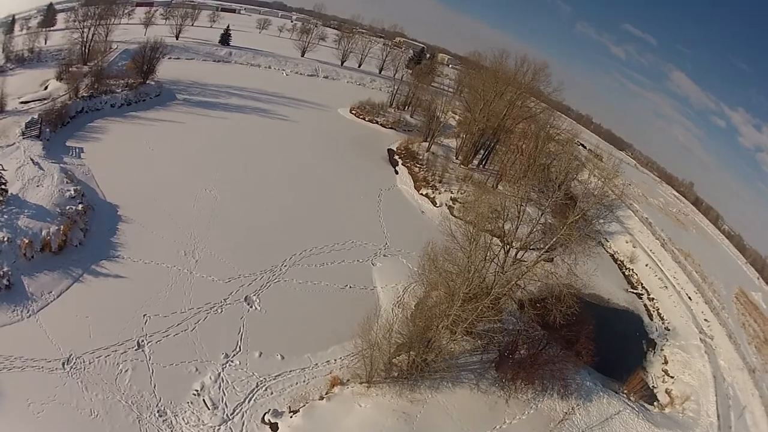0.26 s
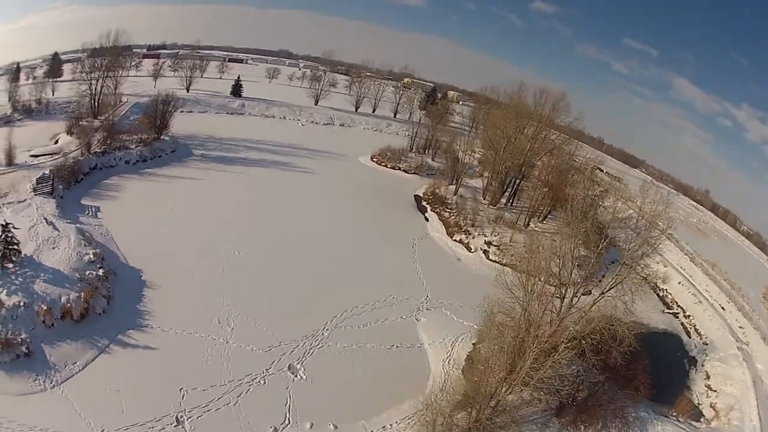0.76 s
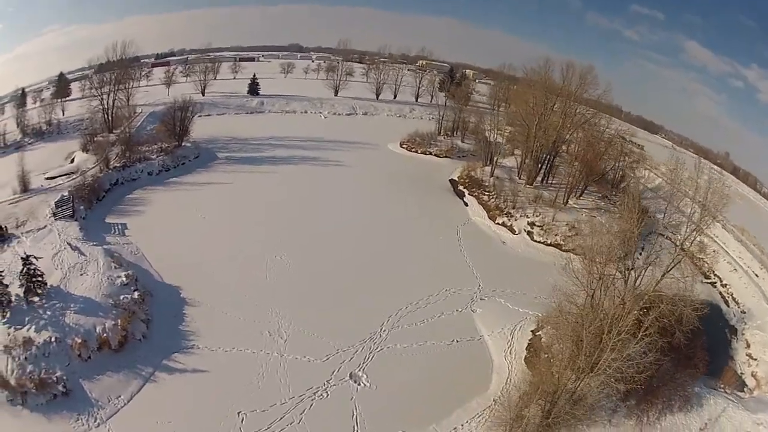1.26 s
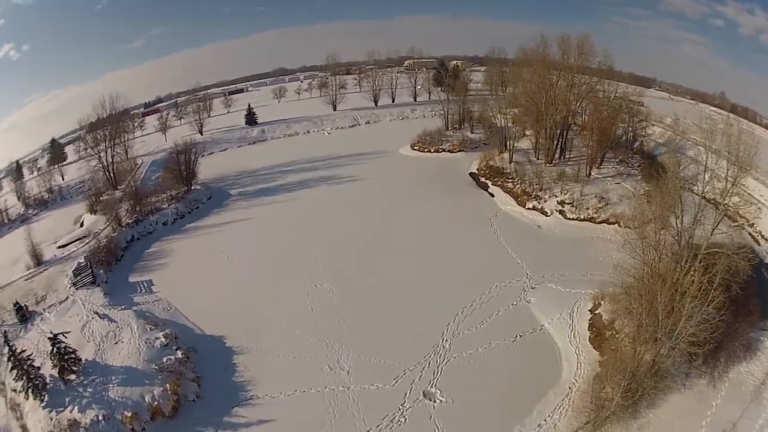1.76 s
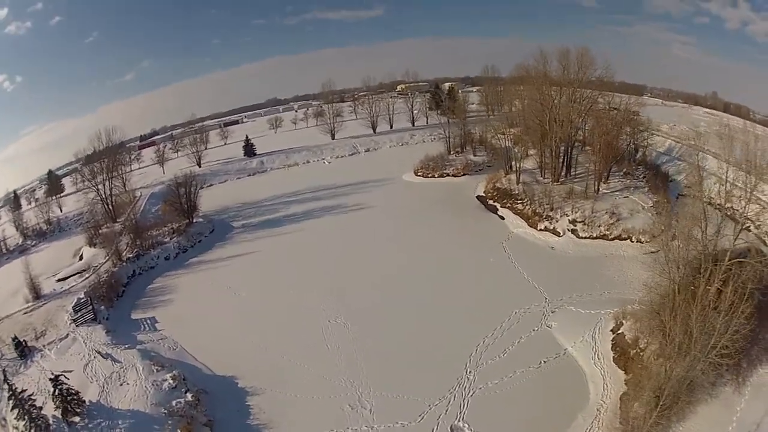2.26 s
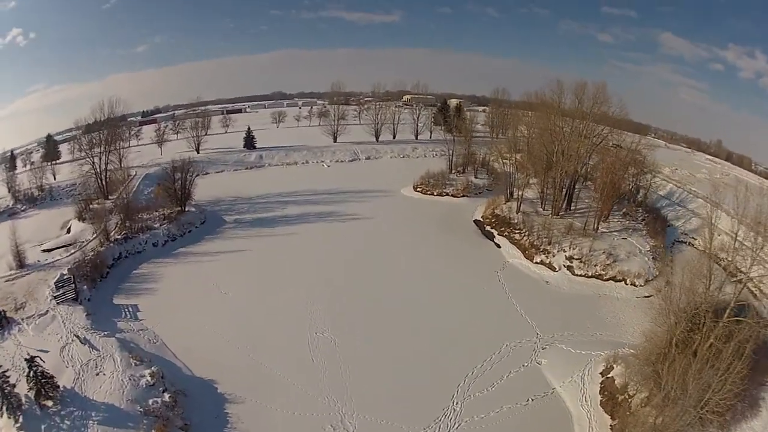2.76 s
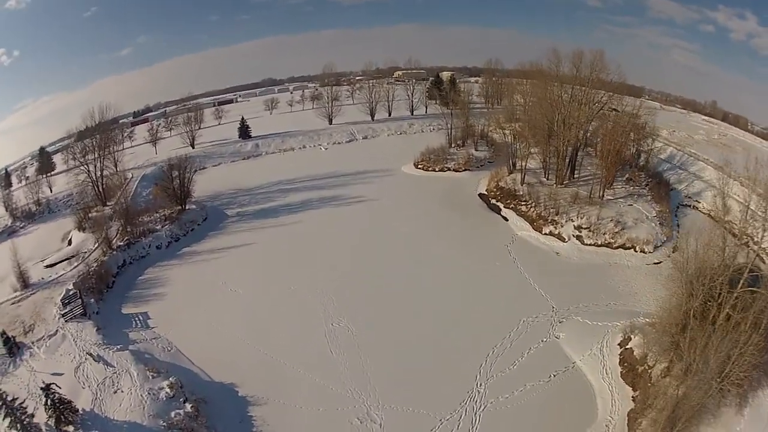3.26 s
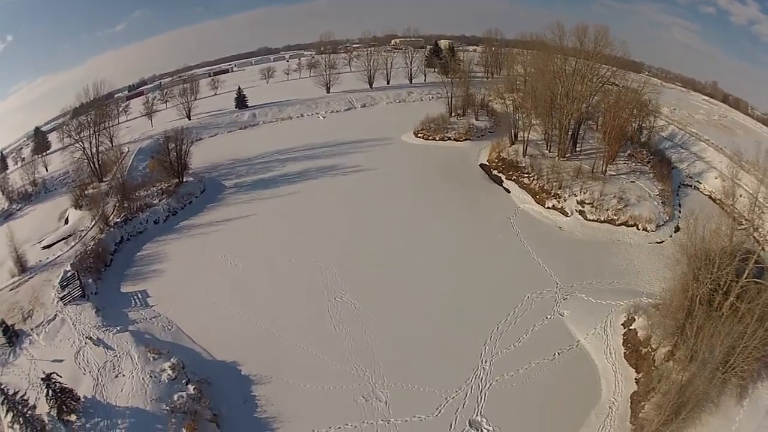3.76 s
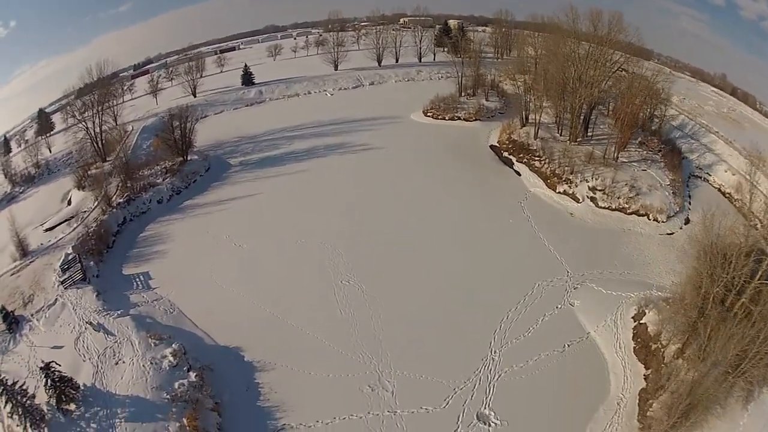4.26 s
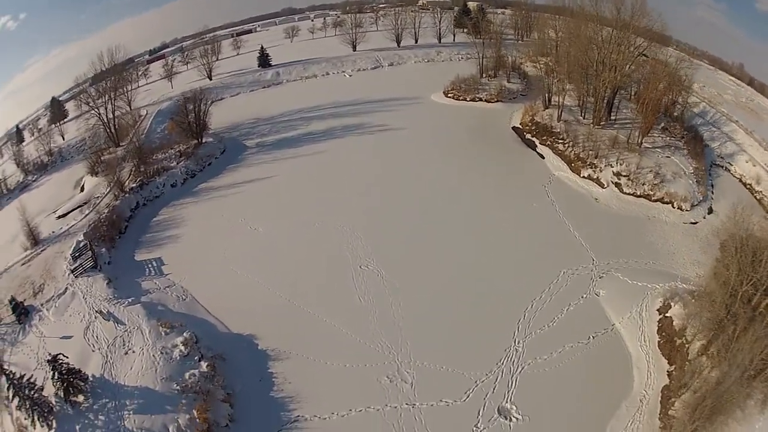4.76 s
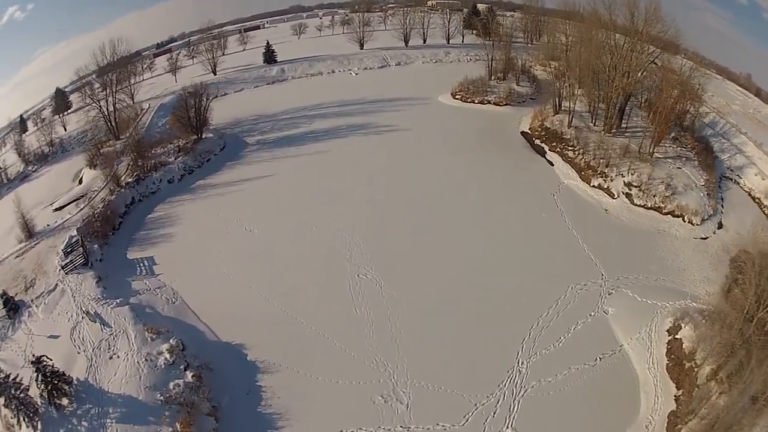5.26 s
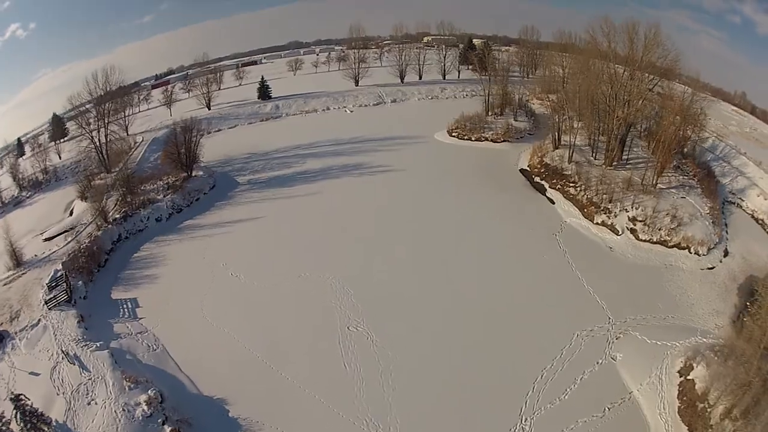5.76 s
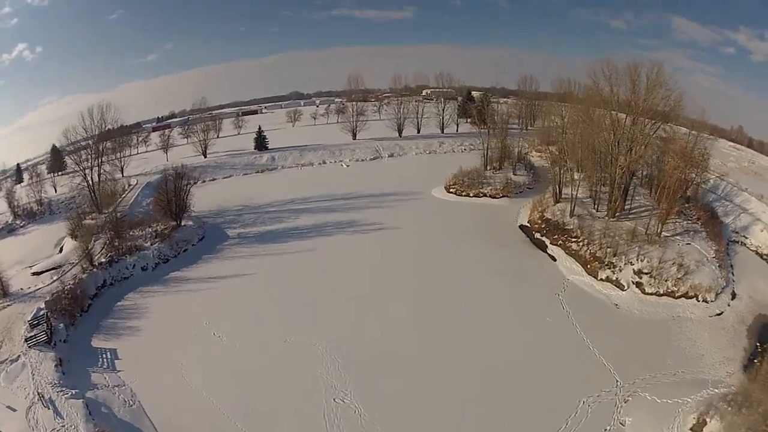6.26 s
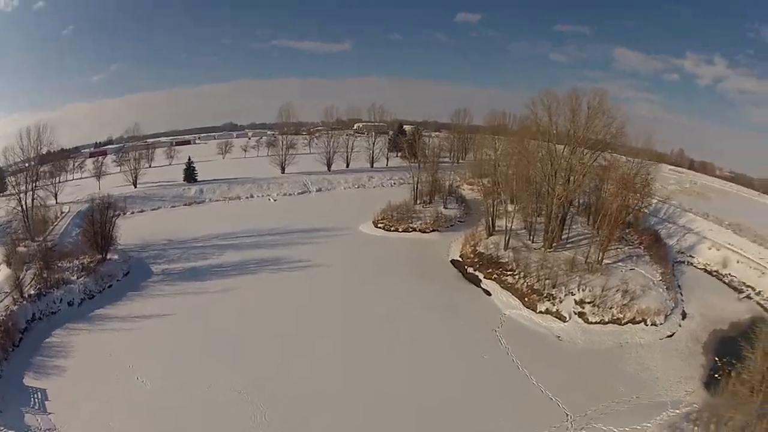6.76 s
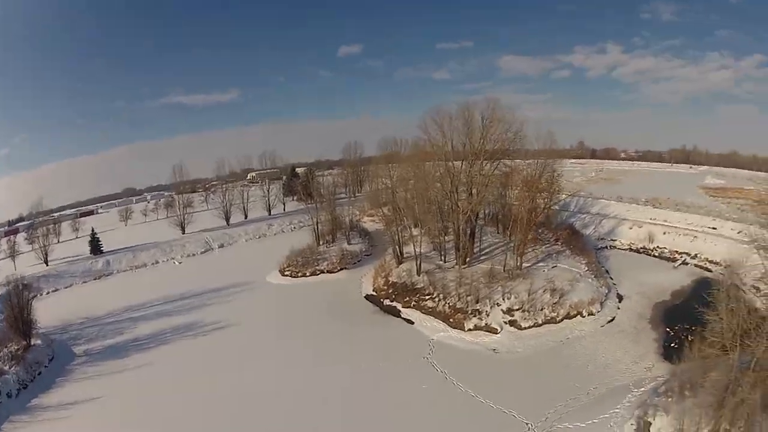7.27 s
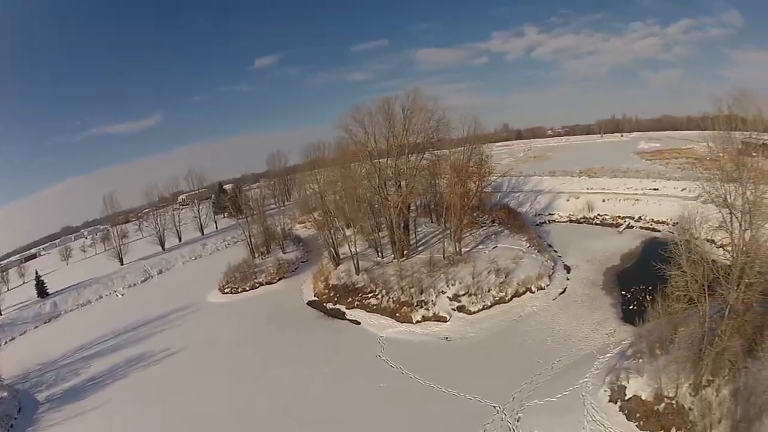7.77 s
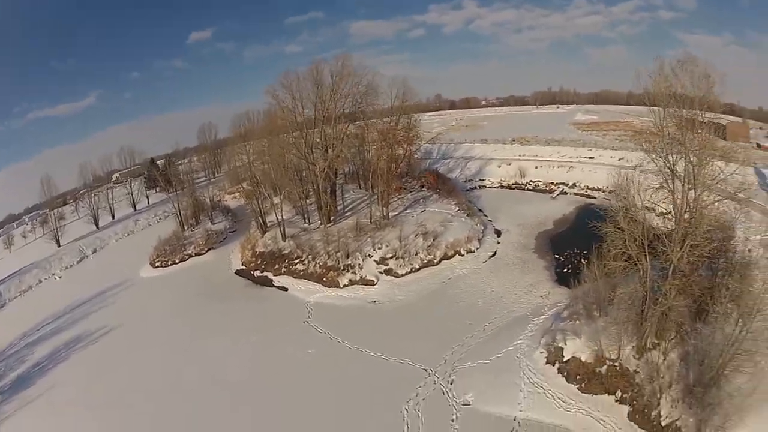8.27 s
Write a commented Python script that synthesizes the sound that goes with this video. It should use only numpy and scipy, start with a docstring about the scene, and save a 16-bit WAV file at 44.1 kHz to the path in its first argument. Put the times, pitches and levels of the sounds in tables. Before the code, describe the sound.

A small quadcopter's propellers drone at a low, slightly wavering pitch, beating against each other, with airy blade hiss. Wind roars and thumps on the onboard microphone in the first four seconds, then a steadier hum follows over open snowy ground until heavy, overloaded gusts strike near eight seconds. The sound is mono, close, coarse and gritty in the treble.

```python
"""A small quadcopter flies over a frozen pond, itself silent, heard from the camera that it carries.
From the start four two-bladed rotors hum at different speeds and beat, air hisses through the blades,
wind rumbles on the microphone, and coarse 8 kHz sampling mirrors it all into a gritty treble.
From 0.7 to 4.1 s gusts roar and single eddies thump; overloads make the limiter duck and recover.
Calmer flight follows until a last cluster from 7.7 s, with the hardest blows near 7.9 s."""
import sys
import numpy as np
from scipy import signal
from scipy.fft import rfft, irfft, next_fast_len
from scipy.io import wavfile
from scipy.ndimage import map_coordinates

SR = 44100
rng = np.random.default_rng(int(sys.argv[2]) if len(sys.argv) > 2 else 0)


def inscribe(sig):
    """Save sig as 16-bit PCM at rate SR to the path in sys.argv[1].

    A 1-D sig is mono; a 2-D sig holds one channel per row.
    Samples are clipped to [-1, 1] before scaling.
    """
    pcm = np.round(np.clip(np.atleast_2d(sig).T, -1, 1) * 32767)
    wavfile.write(sys.argv[1], SR, pcm.astype(np.int16))


N = 375732

# Air through the blades: (time [s], relative hiss level [dB])
AIRFLOW = [(0.0, -36), (0.25, -40.5), (0.7, -36), (1.2, -36), (1.5, -35.5), (1.9, -36.5), (2.42, -31),
           (2.65, -37), (3.7, -38), (4.3, -33.5), (6.3, -30.5), (6.55, -28.5), (6.9, -31), (7.7, -34),
           (8.52, -35)]


def amp(db):
    """Level to amplitude: 20 dB is a factor of ten."""
    return 10 ** (np.asarray(db) / 20)


def unit(x):
    """Normalise the power: scale to rms 1."""
    return x / np.sqrt(np.mean(x ** 2) + 1e-20)


def along(points, hz):
    """Interpolate (frequency or order, value) points on a logarithmic axis."""
    f, v = np.transpose(points)
    return np.interp(np.log(hz + 1e-9), np.log(f), v)


def curves(rows):
    """Interpolate linearly in time: one value per sample for each column after the time."""
    s, *cols = np.transpose(rows)
    return [np.interp(np.arange(N) / SR, s, c) for c in cols]


def wobble(rate):
    """Slow random modulation: a spline through normal deviates, rate knots a second."""
    knots = rng.standard_normal(4096)
    return map_coordinates(knots, [np.arange(N) * rate / SR], mode="wrap")


def filtered(x, response):
    """Linear filtering: multiply the spectrum by a real gain, a function of frequency in Hz."""
    size = next_fast_len(N + 8192)  # zero padding limits wrap-around
    spectrum = rfft(x, size)
    return irfft(spectrum * response(np.fft.rfftfreq(size, 1 / SR)), size)[:N]


def noise(spectrum):
    """Coloured noise: white noise shaped by a spectrum, at rms 1."""
    return unit(filtered(rng.standard_normal(N), lambda hz: amp(along(spectrum, hz))))


def shaft_angle(speed, flutter):
    """Phase is the integral of speed, here a shaft's, which trembles in turbulent air."""
    return 2 * np.pi * np.cumsum(speed * (1 + flutter * wobble(60))) / SR


def rotor(angle, hum_db, imbalance_db, overtone_db, waver_db, count=40, size=4096):
    """Harmonic series of a shaft: order 1 is imbalance, order 2 the passing of two blades, 3 up a buzz."""
    # Overtones of one rotor: (multiple of the shaft speed [1], level relative to overtone_db [dB])
    order_levels = [(3, -23), (4, -15.5), (5, -26), (6, -23.5), (7, -30.5), (8, -35), (10, -44.5),
                    (14, -33), (20, -46), (26, -34.5), (40, -56)]
    turn = np.arange(size) * 2 * np.pi / size
    orders = np.arange(3, count)[:, None]
    phases = rng.uniform(0, 2 * np.pi, orders.shape)
    partials = amp(along(order_levels, orders)) * np.sin(orders * turn + phases)
    one_turn = np.sum(partials, axis=0)
    buzz = amp(overtone_db + waver_db * wobble(14)) * np.interp(angle % (2 * np.pi), turn, one_turn)
    imbalance = amp(imbalance_db + waver_db * wobble(5.0)) * np.sin(angle)
    blades = amp(hum_db + 1.65 * wobble(18)) * np.sin(2 * angle)
    return np.sqrt(2) * (blades + imbalance + buzz)  # root 2 makes the levels rms


def rotors(angles):
    """Interference: the near blade tones beat at twice the shafts' speed difference; the far ones blur it."""
    # Blade tones of the two rotors nearest the microphone:
    # (time [s], first rotor's level [dB], second rotor's level [dB])
    hum_levels = [(0, -16.5, -25), (1.4, -17, -28.5), (2.9, -17.5, -26.5), (3.6, -22, -22.5),
                  (4.4, -19.5, -25), (5.3, -17, -18.5), (6.3, -15.5, -20), (7.2, -17, -25.5),
                  (8.52, -21, -32)]
    far_hum_db, imbalance_db = -28.5, -32
    second_db, far_db = -3, -9  # imbalance and overtones, relative to the first rotor's
    first_hum_db, second_hum_db = curves(hum_levels)
    hiss_db, = curves(AIRFLOW)
    load_db = hiss_db + 16.5  # overtones follow the load on the blades
    first = rotor(angles[0], first_hum_db, imbalance_db, load_db, waver_db=2.5)
    second = rotor(angles[1], second_hum_db, imbalance_db + second_db, load_db + second_db, waver_db=3.0)
    far = sum(rotor(angle, far_hum_db, imbalance_db + far_db, load_db + far_db, waver_db=2.5)
              for angle in angles[2:])
    return first + second + far


def blade_hiss(angles, chop):
    """Amplitude modulation: torn air pulses with each turn; faster flow fills in the frame's resonances."""
    # Hiss in slow and in fast flow: (frequency [Hz], relative spectral level [dB per Hz])
    slow_air = [(60, -35), (300, -7), (700, -44), (1400, -12), (1700, -3), (2100, -11), (2550, -3.5),
                (2900, -24), (3400, -18.5), (4000, -11)]
    fast_air = [(60, -56), (300, -1), (600, 3), (1200, -1), (1800, 2), (2300, -1), (2900, -1), (3400, -0.5),
                (4000, -3.5)]
    hiss_db, = curves(AIRFLOW)
    fast = 1 / (1 + amp(-3 * (hiss_db + 39.5)))  # share of fast flow, half at -39.5 dB
    air = np.sqrt(1 - fast) * noise(slow_air) + np.sqrt(fast) * amp(-2.5) * noise(fast_air)
    pulsing = sum(np.cos(angle) + np.cos(2 * angle) for angle in angles[:2])
    level_db = hiss_db + 9.5 + 0.84 * wobble(14)
    return amp(level_db) * unit(air * np.exp(chop * pulsing))


def wind():
    """Turbulent pressure: eddies rumble and flutter on the microphone; direct gusts roar in its port."""
    # Wind on the microphone: (time [s], level of the large eddies [dB])
    rumble_levels = [(0, -37), (0.4, -31), (0.8, -20), (1.4, -30), (2.25, -18), (2.48, -15), (2.58, -27),
                     (3.25, -45), (3.44, -27), (3.7, -32), (6.5, -29), (7.5, -24), (7.84, -13),
                     (8.25, -16.5), (8.52, -27)]
    # Gusts straight across the port: (start [s], length [s], roar level [dB], flutter level [dB])
    gusts = [(0.673, 0.017, -15, -15), (0.728, 0.19, -12.5, -13), (0.885, 0.33, -17.5, -13.5),
             (1.293, 0.057, -18.5, -11), (1.458, 0.026, -20.5, -15.5), (1.64, 0.04, -25, -13.5),
             (1.685, 0.045, -11, -10), (1.736, 0.13, -18.5, -17.5), (1.872, 0.45, -19.5, -13),
             (2.349, 0.16, -27, -11), (2.627, 0.12, -29.5, -20.5), (3.41, 0.097, -38, -18.5),
             (3.65, 0.038, -44, -20.5), (3.85, 0.11, -50, -19.5), (4.078, 0.02, -48, -27),
             (7.717, 0.1, -47, -17), (7.822, 0.019, -18, -4), (7.913, 0.072, -13, -6),
             (8.028, 0.087, -22.5, -9), (8.198, 0.03, -26, -15), (8.26, 0.12, -44, -25.5)]
    # Eddies and roar: (frequency [Hz], relative spectral level [dB per Hz])
    large_eddies = [(10, -14), (25, -3), (50, 0), (80, -1), (125, -3), (200, -16), (500, -50)]
    small_eddies = [(40, -24), (100, 4.5), (200, 5.5), (300, -2), (420, -7), (560, -22), (1000, -33.5),
                    (3000, -58)]
    roar_spectrum = [(100, -6), (300, 1.5), (480, 2), (650, -3.5), (850, -7), (1100, -11.5), (1500, -18.5),
                     (2300, -28.5), (4000, -44)]
    large_db, = curves(rumble_levels)
    hiss_db, = curves(AIRFLOW)
    roar = np.zeros(N)
    turbulence = amp(hiss_db + 4.5)  # small eddies that the flight keeps stirring
    for start, length, roar_db, flutter_db in gusts:
        shape = gust_shape(start, length)
        roar = np.maximum(roar, amp(roar_db) * shape)
        turbulence = np.maximum(turbulence, amp(flutter_db) * shape)
    lumps = amp(2.4 * wobble(45))  # both eddy sizes swell together
    surges_db = 3 * wobble(8.7)
    rumble = amp(large_db + surges_db) * unit(noise(large_eddies) * lumps)
    flutter = turbulence * unit(noise(small_eddies) * lumps)
    bursts = rng.standard_normal(N) * amp(3.6 * wobble(1000))
    crackle = unit(filtered(bursts, lambda hz: amp(along(roar_spectrum, hz))))
    return rumble + flutter + roar * crackle


def gust_shape(start, length):
    """Linear onset and exponential relaxation: a gust rises quickly, holds and dies away."""
    attack_s, release_s = 0.0085, 0.029  # rise time; time constant of the fall
    age = np.arange(N) / SR - start
    return np.clip(age / attack_s, 0, 1) * np.exp(-np.maximum(age - length, 0) / release_s)


def blasts(cycles, puff_life, rough, size=4096):
    """Impulsive excitation: each eddy pushes the diaphragm once and blows a short, hollow puff in the port."""
    # Single eddies hitting the port:
    # (time [s], push level [dB], push pitch [Hz], puff level [dB], puff pitch [Hz])
    eddy_hits = [(0.686, 1.5, 167, -5.5, 790), (0.728, 0, 146, -6, 700), (0.772, -2, 197, -8, 1020),
                 (0.802, -6, 252, -7.5, 1250), (0.887, 7, 300, -2, 750), (0.897, 2, 208, -1, 783),
                 (1.022, -12, 200, -11.5, 750), (1.301, -5, 159, -12, 710), (1.707, -3, 170, -2, 680),
                 (1.755, -6, 119, -6, 850), (2.461, -0.5, 93, -12, 830), (2.502, 5.5, 99.4, -2, 490),
                 (2.752, 2.5, 189.9, -30, 600), (2.760, -9, 192.1, 0, 574), (3.423, -8, 246, -26, 400),
                 (3.488, -6.5, 276, -31, 400), (3.667, -12, 292, -17, 378.8), (4.100, -4.5, 167, -28, 420),
                 (7.817, -2, 109, -18, 445), (7.83, 8, 90.6, -15, 790), (7.915, 4.5, 109, -10, 450),
                 (7.944, 11, 192, 7, 940), (7.946, 16, 148, 1, 453), (7.990, -16, 200.4, -2.5, 605),
                 (8.105, 0, 160, -6.5, 544), (8.2, 0.5, 110, -22, 500), (8.261, -1, 125, -21, 449.7),
                 (8.304, 0.5, 128, -25, 454), (8.386, -4.5, 192.4, -25, 500)]
    # Breath of a puff: (multiple of the puff's pitch [1], relative spectral level [dB])
    puff_spectrum = [(.15, 10), (.5, -35), (1, 11.5), (1.5, -6), (2.4, -6.5), (5, -22)]
    out = np.zeros(N + size)
    t = np.arange(size) / SR
    hz = np.fft.rfftfreq(size, 1 / SR)
    for s, push_db, push_hz, puff_db, puff_hz in eddy_hits:
        push = swell((t * push_hz / cycles) ** 2) * np.sin(2 * np.pi * push_hz * t)
        white = rfft(rng.standard_normal(size))
        air = unit(irfft(white * amp(along(puff_spectrum, hz / puff_hz))))
        tone = swell(t / puff_life) * np.sin(2 * np.pi * puff_hz * t)
        puff = tone + rough * swell(t / (2 * puff_life)) * air
        out[round(s * SR):][:size] += amp(push_db) * push + amp(puff_db) * puff
    return out[:N]


def swell(age):
    """Critically damped response: a quick rise and decay that peaks at 1 when age is 1."""
    return age * np.exp(1 - age)


def limiter(x):
    """Gain control: overloads cut the gain within milliseconds; it climbs back at a steady rate in dB."""
    limit_db, attack_s, recovery_db_per_s = -0.5, 0.0068, 52
    over_db = np.maximum(20 * np.log10(np.abs(x) + 1e-9) - limit_db, 0)
    climb_db = recovery_db_per_s * np.arange(N) / SR
    cut_db = np.maximum.accumulate(over_db + climb_db) - climb_db  # latest peaks, minus the recovery
    keep = np.exp(-1 / (attack_s * SR))
    smooth_cut_db = signal.lfilter([1 - keep], [1, -keep], cut_db)
    return x * amp(-smooth_cut_db)


def scene():
    """Superposition: the sources add; all rotors follow one throttle, each at its own offset."""
    # Throttle: (time [s], shaft speed [turns per second])
    throttle = [(0.0, 84), (0.13, 88), (0.28, 79.6), (0.55, 79.7), (0.65, 84.6), (1.49, 87), (1.63, 80.4),
                (2.52, 94.7), (2.99, 82.7), (3.25, 80.7), (3.9, 77), (4.4, 80), (4.7, 76), (5.2, 84.4),
                (6.15, 84), (7.3, 81.6), (7.95, 78.8), (8.52, 78)]
    # Steering: (time [s], how much slower the second rotor turns than the first [turns per second])
    steering = [(0.0, 3.93), (0.22, 1.07), (0.92, 3.31), (1.86, 1.47), (1.86, 2.09), (2.93, 1.95),
                (3.6, 4.44), (3.61, 0.97), (4.32, 2.53), (5.04, 1.89), (5.26, 5.59), (5.57, 3.85),
                (5.67, 4.69), (6.3, 2.62), (6.61, 2.35), (7.37, 5.08), (7.39, 3.32), (8.52, 2.97)]
    # Mean speeds of the two far rotors: (third over throttle [1], fourth over throttle [1])
    far_ratios = (0.93, 1.06)
    speed, = curves(throttle)
    trim, = curves(steering)
    hunting = 1 + .018 * wobble(11)  # the flight controller's small speed corrections
    first = shaft_angle(speed * hunting, flutter=0.00996)
    slip = .16 * wobble(25)  # radians: the second rotor trembles against the first
    lag = 2 * np.pi * np.cumsum(trim) / SR + slip
    far = [shaft_angle(speed * (ratio + .028 * wobble(9)), flutter=0.01176) for ratio in far_ratios]
    angles = [first, first - lag] + far
    flight = rotors(angles) + blade_hiss(angles, chop=0.14)
    buffeting = wind() + blasts(cycles=0.67, puff_life=0.0011, rough=0.28)  # puff_life in seconds
    return (flight + buffeting)[None]


def record(dry):
    """Sampling: the camera limits, clips and holds coarse samples; images mirror about the rate's multiples."""
    camera_hz, top_hz = 8000, 15500  # sampling rate; upper band edge
    clipped = np.clip(limiter(dry[0]), -1, 1)

    def input_response(hz):
        """Band limitation: nothing passes from half the sampling rate up."""
        return (hz < camera_hz / 2) * amp(np.interp(hz, [3450, 3750, 4000], [0, -5, -12]))

    band = filtered(clipped, input_response)
    clock = 2 * np.pi * camera_hz * np.arange(N) / SR
    sampled = band * (1 + 2 * np.cos(clock) + 2 * np.cos(2 * clock))  # images about 8 and 16 kHz
    # the sinc is the hold's magnitude with its signs; a slight treble lift follows
    held = filtered(sampled, lambda hz: np.sinc(hz / camera_hz) * amp(1.9 * hz / top_hz))
    self_noise = amp(-50.5) * rng.standard_normal(N)
    return filtered(held + self_noise, lambda hz: hz < top_hz)[None]


dry = scene()
out = record(dry)
inscribe(out)
```